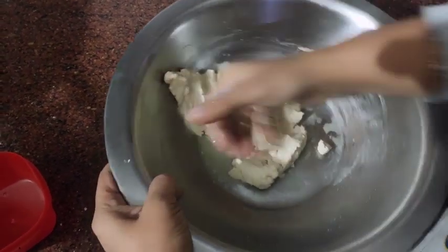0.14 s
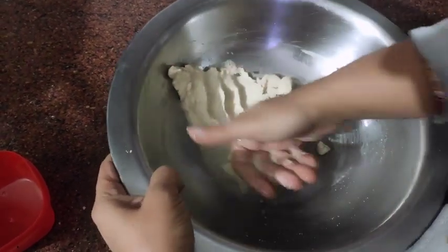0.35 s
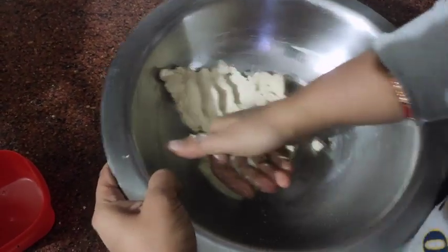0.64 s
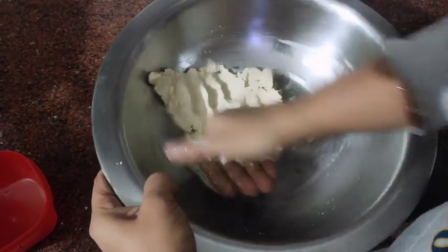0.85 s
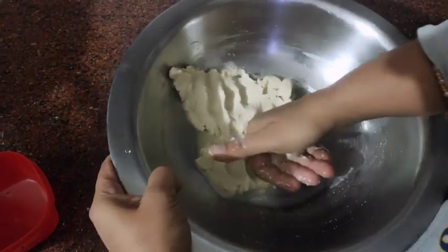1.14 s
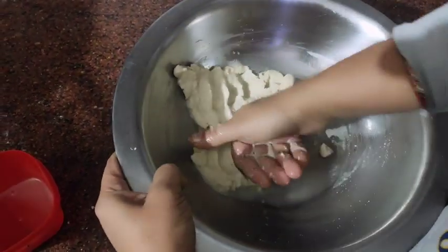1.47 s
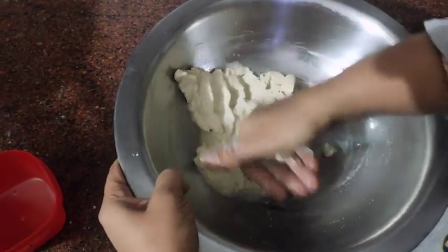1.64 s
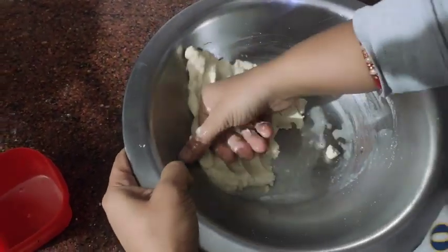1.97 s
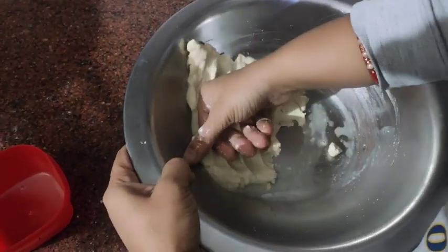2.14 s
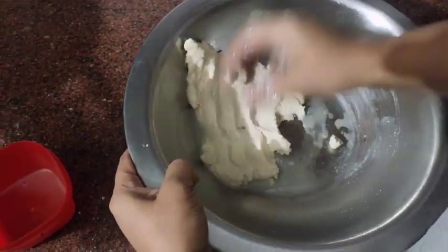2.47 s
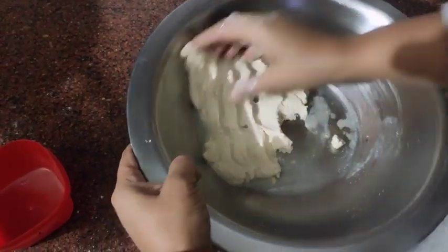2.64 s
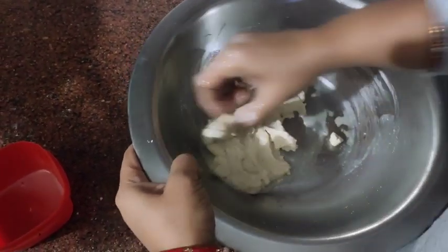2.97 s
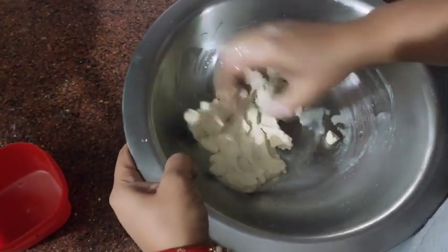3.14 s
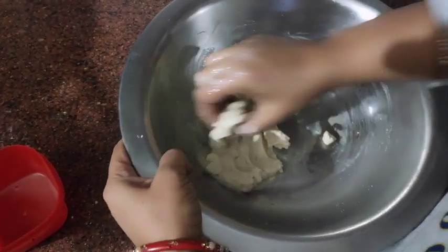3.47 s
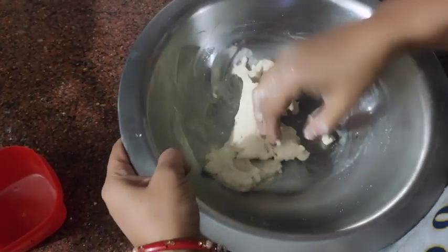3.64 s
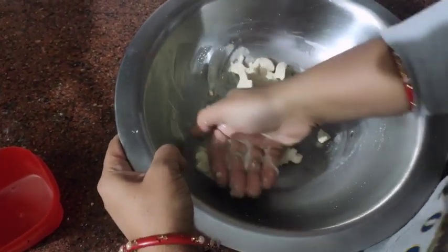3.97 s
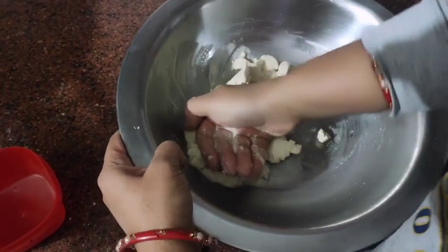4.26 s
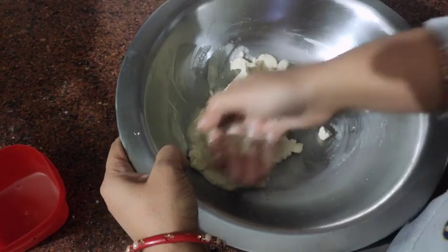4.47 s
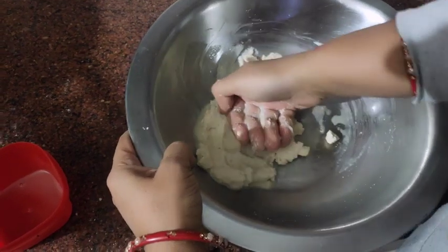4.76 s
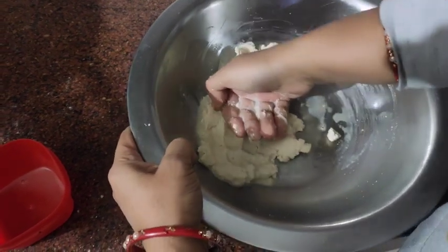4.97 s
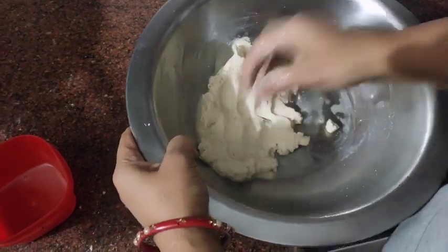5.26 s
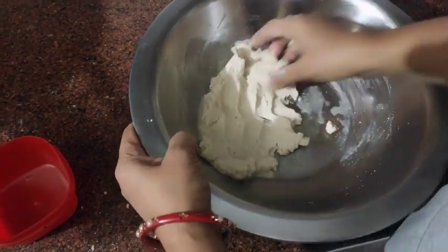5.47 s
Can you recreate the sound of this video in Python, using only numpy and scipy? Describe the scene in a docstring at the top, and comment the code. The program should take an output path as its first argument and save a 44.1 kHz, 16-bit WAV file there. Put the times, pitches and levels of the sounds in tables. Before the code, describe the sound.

Close, dry scrubbing hiss on thin metal, about three push-and-return pairs a second, with small bowl rattles, knocks on the floor and soft dough thumps.

```python
"""A hand kneads soft dough in a wide stainless steel bowl on a kitchen floor, close to a stereo microphone.
Rubbing on the steel, made of random slips, hisses in long pushes and short returns, about three pairs a second.
The jostled bowl clinks in dying sines, its base knocks and drags on the floor, and dough thuds in noise bursts.
Hard ticks are very short sines; quiet kitchen air and a faint mains hum lie behind."""
import sys
import numpy as np
from scipy import signal
from scipy.fft import rfft, irfft
from scipy.io import wavfile
from scipy.ndimage import uniform_filter1d

SR = 44100
rng = np.random.default_rng(int(sys.argv[2]) if len(sys.argv) > 2 else 0)


def store_wav(level_fs):
    """Save 16-bit WAV to argv[1]."""
    pcm = np.round(np.clip(np.atleast_2d(level_fs), -1, 1) * 32767)
    wavfile.write(sys.argv[1], SR, pcm.T.astype(np.int16))


N = 247530
TIME = np.arange(N) / SR

# one row a kneading cycle, a long push and then a short return: (start [s], relative push level at its end [dB],
# swell over the push [dB], offset halfway [dB], return length [s], relative return level [dB],
# dip at the turns [dB], rasp [dB], resonance of the hollow under the hand [Hz], its height [dB])
KNEADING_CYCLES = [(-0.22, -23, 3.5, -1.0, 0.052, -41.0, -6, 0, 5700, -3),
                   (0.051, -30.5, 6, -2, 0.074, -42.5, -1.5, -2, 3150, -2.5),
                   (0.295, -32.5, 4.5, -4.5, 0.088, -38.5, -9, -1.5, 3320, 3.5),
                   (0.628, -34, 4.0, 0, 0.076, -35, -8.5, -3.5, 3790, 8),
                   (0.903, -33, 1.5, -3.5, 0.081, -37.5, -11.5, -1.5, 4350, 7),
                   (1.209, -33.5, 3, -2.5, 0.076, -35.5, -11.5, -1.0, 5150, 8),
                   (1.508, -35, 0.5, 0, 0.084, -39, -10, -2.5, 5100, 6.5),
                   (1.82, -34, 2.0, -2, 0.075, -37, -11, -1, 4700, -0.5),
                   (2.122, -32.5, 4, -3, 0.073, -35, -11.5, -1.0, 2850, -2.5),
                   (2.424, -31.5, 5.5, -1.5, 0.076, -35.5, -11, -3.5, 2770, 2.5),
                   (2.725, -34.5, 1.5, -3, 0.085, -39.5, -13, -3, 2660, 6),
                   (3.034, -35, 4.5, -1, 0.084, -40, -8, -4, 2750, 3.5),
                   (3.34, -33.5, 6.5, -1.5, 0.089, -39.5, -8.5, -1, 7500, 4.5),
                   (3.637, -32, 3.5, -1.5, 0.087, -38.5, -12.5, -1, 5600, 7),
                   (3.939, -33.0, 1, -3, 0.079, -37.5, -8.5, -2.5, 4600, -1.5),
                   (4.226, -34.0, 9, -2.5, 0.093, -41, -12.5, 1.5, 4130, -4.5),
                   (4.549, -36, 4.5, -0.5, 0.086, -39, -10.5, -2.0, 2730, 4.5),
                   (4.842, -35.5, 1.5, -0.5, 0.093, -43, -12, -0.5, 6600, -1.5),
                   (5.151, -38, 5.5, 1, 0.084, -42.5, -10.5, -1.5, 6460, 6),
                   (5.448, -31, 12, 17, 0.12, -40.5, -11.0, 2.5, 2780, 2)]


def amp(db):
    """Decibels to gain."""
    return 10 ** (np.asarray(db) / 20)


def unit(x):
    """Scales to an rms of one."""
    return x / np.sqrt(np.mean(x ** 2) + 1e-20)


def colour(x, points):
    """Filters by a spectrum of (frequency [Hz], gain [dB]) points."""
    hz, db = np.transpose(points)
    f = np.fft.rfftfreq(x.shape[-1], 1 / SR)
    gain = amp(np.interp(np.log(f + 1), np.log(hz), db))
    return irfft(rfft(x) * gain, x.shape[-1])


def add(mix, s, sound):
    """Mixes a sound in at time s."""
    part = mix[max(round(s * SR), 0):][:len(sound)]
    part += sound[:len(part)]


def resonate(x, hz, width):
    """A resonance of gain one that follows the pitch hz: shift it to zero, smooth, and shift it back."""
    turn = np.exp(2j * np.pi * np.cumsum(hz * np.ones(len(x))) / SR)
    r = np.exp(-np.pi * width / SR)
    return 2 * (turn * signal.lfilter([1 - r], [1, -r], x / turn)).real


def slips(n, per_s, spread_db):
    """Random stick-slip impulses of uneven size."""
    size = amp(spread_db * np.minimum(rng.exponential(1, n), 4))
    return unit(size * rng.standard_normal(n) * (rng.random(n) < per_s / SR))


def ring(modes, t):
    """Dying sines of a struck part."""
    return sum(amp(db - 60 * t / t60) * np.sin(2 * np.pi * hz * t) for hz, db, t60 in modes)


def space(x, lag_s, bowl_db, bowl_t60, room_db, room_t60=0.13):
    """Direct sound, delayed on the right by the lag, then dense echoes inside the bowl and a weak kitchen tail."""
    t = np.arange(SR // 3) / SR
    paths = np.zeros((2, len(t)))
    paths[0, 0] = paths[1, round(abs(lag_s) * SR)] = 1
    for db, t60 in ((bowl_db, bowl_t60), (room_db, room_t60)):
        tail = rng.standard_normal(paths.shape) * amp(-60 * t / t60) * (t > .001)
        paths += amp(db) * tail / np.linalg.norm(tail, axis=1, keepdims=True)
    paths /= np.linalg.norm(paths, axis=1, keepdims=True)
    return signal.fftconvolve(x[None], paths, axes=1)[:, :N]


def panned(x, left_db):
    """Sets the left microphone this much above the right; negative leans to the right."""
    return x * amp([[left_db / 2], [-left_db / 2]])


def rubbing(hiss_db=9.0, rasp_db=12.5, rasp_growth=0.066, flutter_db=-0.68, split_hz=5400):
    """Tiny slips under the fingers and the heel of the hand swell and stop with each stroke; grip adds a lower rasp."""
    # hiss of rubbed steel at each microphone: (frequency [Hz], left gain [dB], right gain [dB])
    steel = [(30, -52, -69), (150, -46, -25.5), (626, -20.5, -18), (1280, -17.5, -18), (1740, -8.5, -12),
             (2090, -14, -12), (2533, -6.5, -8.5), (3680, -1.5, 0.5), (4020, -2.5, -10), (4456, -0.5, 1),
             (5150, -3.5, -0.5), (6550, 3.5, 0.5), (7190, 4.5, -7.5), (8270, -12.5, -15),
             (10840, -14, -16.5), (13200, -10.5, -9.5)]
    # modes of the wall that sing under the rubbing: (frequency [Hz], width [Hz], left gain [dB], right gain [dB])
    wall = [(923, 12, -13, -20), (2686, 25, -11, -20), (4355, 90, -5, -5), (5690, 55, -10, -6),
            (6155, 50, -5, -4), (6681, 120, -5, -8), (7110, 35, 3, -8)]
    # the fingers rub harder than the heel of the hand: (fingers level [dB], heel level [dB]), relative
    contacts_db = (2.8, -6)
    stroke_db, grip_db = strokes()
    grip_db = grip_db + rasp_growth * (stroke_db - stroke_db.mean())  # louder strokes rasp more
    low = 1 / (1 + (np.fft.rfftfreq(N, 1 / SR) / split_hz) ** 12)
    rub = np.zeros((2, N))
    for contact_db in contacts_db:
        flutter = flutter_db * unit(uniform_filter1d(rng.standard_normal((2, N)), size=600))
        grains = rfft(0.64 * slips(N, 3000, 1.9) + 0.35 * rng.standard_normal(N))
        hiss = irfft(grains * (1 - low), N) * amp(stroke_db + flutter[0] + hiss_db)
        rasp = irfft(grains * low, N) * amp(stroke_db + flutter[1] + grip_db + rasp_db)
        rub += amp(contact_db) * wander(hollow(hiss + rasp), spots_per_s=8, tint_db=3.3)
    out = []
    for side in range(2):
        sung = sum(amp(db[side]) * resonate(rub[side], hz, width) for hz, width, *db in wall)
        sung = np.pad(sung, (SR // 300, 0))[:N]  # the wall answers a moment after the contact
        rubbed = colour(rub[side], [(hz, db[side]) for hz, *db in steel])
        out.append(rubbed + sung)
    return np.array(out)


def strokes(end_s=8.9):
    """Level and grip of the hand: it speeds up, leans into the push, stops, and flicks back."""
    speed_up_s, slow_down_s, return_edge_s = 0.036, 0.046, 0.028
    grip_push_db, grip_return_db = -2.5, -3  # low rasp over hiss, before each stroke's own rasp
    s, push_db, swell_db, sag_db, return_s, return_db, dip_db, rasp_db, *_ = np.transpose(KNEADING_CYCLES)
    end = np.append(s[1:], end_s)
    turn = end - return_s
    early, late = s + speed_up_s, turn - slow_down_s
    rest_db = (push_db + return_db) / 2 + dip_db
    phases = [(early, push_db - swell_db, grip_push_db),
              ((early + late) / 2, push_db - swell_db / 2 + sag_db, grip_push_db),
              (late, push_db, grip_push_db),
              (turn, rest_db, grip_return_db),
              (turn + return_edge_s, return_db, grip_return_db),
              (end - return_edge_s, return_db, grip_return_db),
              (end, rest_db, grip_return_db)]
    at, level_db, grip_db = zip(*phases)
    at = np.maximum.accumulate(np.ravel(at, "F"))  # phases of a short return never run backwards
    level_db = np.interp(TIME, at, np.ravel(level_db, "F"))
    grip_db = np.interp(TIME, at, np.ravel(rasp_db[:, None] + grip_db))
    return level_db, grip_db


def hollow(x, width_hz=280):
    """The hollow between hand and steel resonates at a new pitch with each stroke."""
    s, *_, hz, db = np.transpose(KNEADING_CYCLES)
    stroke = np.clip(np.searchsorted(s, TIME) - 1, 0, len(s) - 1)
    hz, db = uniform_filter1d(np.array([hz, db])[:, stroke], size=2000)  # glide between strokes
    return x + (amp(db) - 1) * resonate(x, hz, width_hz)


def wander(x, spots_per_s, tint_db, count=13):
    """The hand moves round a ring of spots, each with its own notches and its own echoes in the bowl."""
    out, hz = np.zeros((2, N)), np.geomspace(800, 15000, num=64)
    for k in range(count):
        away = np.abs((TIME * spots_per_s - k + 1) % count - 1)
        near = np.cos(np.pi / 2 * np.minimum(away, 1))
        notches_db = tint_db * (1 - np.minimum(rng.exponential(1, len(hz)), 4))
        tinted = colour(x * near, np.c_[hz, notches_db])
        out += space(tinted, lag_s=.00045, bowl_db=6.5, bowl_t60=.03, room_db=-9)
    return out


def clinks(clunk_db=5.0, ping_db=16.0, scuff_db=-12.0, scuff_s=0.04):
    """A short rattling contact gives the held rim a dry clunk and a ping, with a new mix each time, and a scuff."""
    # light clinks of the bowl: (time [s], relative clunk level [dB], relative ping level [dB])
    clink_times = [(0.116, -32.5, -28.5), (0.168, -36.5, -35), (0.292, -33.5, -25.5), (0.382, -29.5, -23),
                   (0.579, -39.5, -36), (0.851, -33.5, -33.5), (1.06, -39.5, -27), (1.525, -41, -33),
                   (2.291, -37.5, -40), (2.478, -45.5, -82.5), (2.779, -31, -37), (2.87, -38, -46),
                   (2.982, -38.5, -48), (3.111, -42.5, -42), (3.279, -35, -45), (3.402, -29.5, -28.5),
                   (3.64, -39.5, -30), (3.693, -39.5, -36), (3.933, -42.5, -33), (4.381, -45, -50),
                   (4.501, -39.5, -44), (4.523, -36, -43), (5.138, -35, -36.5), (5.188, -42, -48),
                   (5.371, -50, -59), (5.396, -37.5, -46), (5.476, -34, -39.5), (5.52, -38, -45),
                   (5.584, -35, -34)]
    # modes of the rim: (nominal frequency [Hz], nominal level [dB], t60 [s])
    rim = [(930, -19, 0.28), (990, 0, 0.016), (1130, -6, 0.012), (1670, -20, 0.03), (2700, -23, 0.15),
           (3050, -7, 0.008), (3380, -1, 0.014), (3520, -20, 0.05), (3750, -7, 0.007)]
    scuff_spectrum = [(400, -20), (1050, 0), (1500, -10), (3400, -16), (5000, -35), (9000, -60)]
    # the place of contact changes the mix and the damped modes
    spread_db, detune = 1.5, .025
    clunk_rise_s, ping_rise_s = .0004, .0014  # the high modes build up more slowly
    t, out = np.arange(SR // 2) / SR, np.zeros(N)
    for s, low_db, high_db in clink_times:
        contact = .018 * rng.standard_normal(len(t)) * np.exp(-t / .0035)
        contact[0] = 1
        modes = [(hz * (1 + detune * (t60 < .1) * rng.standard_normal()),
                  db + spread_db * rng.standard_normal(), t60) for hz, db, t60 in rim]
        clunk = ring([m for m in modes if m[0] < 2000], t) * (1 - np.exp(-t / clunk_rise_s))
        ping = ring([m for m in modes if m[0] >= 2000], t) * (1 - np.exp(-t / ping_rise_s))
        struck = amp(low_db + clunk_db) * clunk + amp(high_db + ping_db) * ping
        tone = signal.fftconvolve(contact, struck)[:len(t)]
        scuff = unit(colour(rng.standard_normal(len(t)), scuff_spectrum))
        add(out, s, tone + amp(low_db + scuff_db) * scuff * np.exp(-t / scuff_s))
    # a thin rim radiates no bass
    out = signal.sosfilt(signal.butter(2, 600, "high", fs=SR, output="sos"), out)
    heard = space(out, lag_s=.0002, bowl_db=-12, bowl_t60=.03, room_db=-17)
    return panned(heard, left_db=2.5)


def base(knock_db=-17.0, drag_db=2.0):
    """The base knocks, chatters and drags; in the drags its pitch rises as the thin steel is flexed."""
    # the base knocks on the floor: (time [s], relative level [dB], chatter decay [s],
    # pitch factor on the base modes [ratio], brightness [dB per two octaves])
    knocks = [(1.5245, -49, 0.016, 0.91, 25), (2.6065, -23, .003, 1.3, 4.5),
              (2.6122, -20.5, 0.0049, 1.05, 5.5), (3.279, -15.5, 0.0075, 1.0, -5.5),
              (5.3945, -22, .0015, 1.2, -5), (5.478, -37, .003, 0.88, -5)]
    # the base drags on the floor: (time [s], length [s], relative level [dB], fade [dB/s], pitch factor [ratio],
    # its rise [1/s], centre of the grinding [Hz], fall to either side [dB/octave])
    drags = [(2.622, 0.069, -44.5, 40, 0.88, 0.29, 330, 5), (2.628, 0.29, -51, 4, 1.03, 0.57, 890, 11),
             (3.29, 0.14, -41, 73, 1.0, 0.05, 520, 2), (5.402, 0.12, -47, -3, 1.03, 0.087, 590, 12),
             (5.463, 0.29, -43.5, 19, 0.97, 0.11, 695, 16)]
    # modes of the base before the pitch factor: (frequency [Hz], relative level [dB], t60 [s])
    base_modes = [(303, -5, 0.22), (357, -2, 0.075), (410, -10, 0.042), (497, -8, 0.22), (598, 0, 0.075),
                  (696, -2, 0.07), (885, -3, 0.05), (1145, -5, 0.055), (1370, -6, 0.09), (1760, -13, 0.094)]
    drag_width = 2.0  # width of a dragged mode [Hz] times its t60 [s]
    t, out = np.arange(SR // 2) / SR, np.zeros(N)
    for s, db, chatter_s, pitch, bright_db in knocks:
        contact = .014 * slips(len(t), 1500, 1.0) * np.exp(-t / chatter_s)
        contact[0] = 1
        modes = [(hz * pitch, mode_db + bright_db * np.log2(hz / base_modes[0][0]) / 2, t60)
                 for hz, mode_db, t60 in base_modes]
        knock = signal.fftconvolve(contact, ring(modes, t))[:len(t)]
        add(out, s, amp(db + knock_db) * knock)
    for s, length_s, db, fade_db_per_s, pitch, rise_per_s, grind_hz, fall_db in drags:
        grit = slips(len(t), 2000, .6)
        flex = pitch + rise_per_s * t
        tone = sum(amp(mode_db - fall_db * abs(np.log2(hz / grind_hz)))
                   * resonate(grit, hz * flex, drag_width / t60) for hz, mode_db, t60 in base_modes)
        envelope = np.minimum(t / .01, 1) * np.maximum(1 - (t / length_s) ** 4, 0)
        add(out, s, amp(drag_db + db - fade_db_per_s * t) * envelope * unit(tone))
    out = signal.sosfilt(signal.butter(5, [270, 1900], "band", fs=SR, output="sos"), out)
    heard = space(out, lag_s=0, bowl_db=-9, bowl_t60=.04, room_db=-10)
    return panned(heard, left_db=-2.5)


def thuds(level_db=1.0, attack_s=0.003):
    """Soft dough squashes against the steel with a dull push and a short boom of the wall."""
    # dough pushed against the bowl: (time [s], relative level [dB], decay [s], boom of the wall over the push [dB])
    pushes = [(.118, -62, 0.084, 12.5), (0.295, -61, 0.05, 5.5), (.384, -56, 0.045, -6),
              (0.852, -55.5, 0.058, -1), (1.091, -56.5, 0.08, 1), (1.526, -47.5, 0.032, -1.5),
              (2.296, -58, 0.06, 7.5), (2.61, -55, 0.061, 8), (3.28, -55, 0.062, 7.5),
              (3.403, -62, 0.06, 13), (3.578, -59, 0.076, -5.5), (3.905, -61, 0.05, 3),
              (4.502, -53.5, 0.024, 7), (4.892, -75, 0.035, 21.5), (5.092, -66.5, 0.069, 16),
              (5.394, -55.5, 0.026, 11), (5.475, -57.5, 0.14, 0)]
    # spectrum of the squashed dough: (frequency [Hz], gain [dB])
    dough = [(30, -24), (70, -7), (110, 8), (200, 6), (340, 2), (800, -6), (1500, -12), (4000, -50)]
    boom_hz, pass_width_hz = 532, 182  # the wall, damped by the dough, as two equal resonances in a row
    t, out = np.arange(SR // 2) / SR, np.zeros(N)
    for s, db, decay_s, boom_db in pushes:
        squash = rng.standard_normal(len(t))
        boom = resonate(resonate(squash, boom_hz, pass_width_hz), boom_hz, pass_width_hz)
        push = (1 - np.exp(-t / attack_s)) * np.exp(-t / decay_s)
        body = unit(colour(squash, dough)) + amp(boom_db) * unit(boom)
        add(out, s, amp(db + level_db) * push * body)
    heard = space(out, lag_s=0, bowl_db=-11, bowl_t60=.04, room_db=-10)
    return panned(heard, left_db=-3.0)


def snaps(decay_s=0.00018):
    """Hard ticks on the steel: sines only a few cycles long."""
    # sharp ticks: (time [s], relative level [dB], pitch [Hz])
    ticks = [(0.1848, -20, 6800), (1.5322, -8, 4300), (2.607, -23, 6300), (2.613, -23, 6400),
             (3.935, -30, 2400), (4.385, -31, 1900), (4.912, -19, 6200)]
    t, out = np.arange(SR // 100) / SR, np.zeros(N)
    for s, db, hz in ticks:
        envelope = t / decay_s * np.exp(1 - t / decay_s)
        add(out, s, amp(db) * envelope * np.sin(2 * np.pi * hz * t))
    return space(out, lag_s=0, bowl_db=-6, bowl_t60=.012, room_db=-13)


def room():
    """Quiet kitchen air, noise largely shared by both microphones, and a faint hum of steady sines."""
    # spectrum of the room noise: (frequency [Hz], gain [dB])
    air_spectrum = [(25, -22), (55, -4.5), (110, -2), (170, 0), (240, 0), (305, 3.5), (400, 0), (540, 2),
                    (750, -3), (1500, -10), (5000, -15.5), (15000, -13)]
    # faint mains hum: (frequency [Hz], rms level [dB])
    hum_tones = [(100, -83), (200, -80), (300, -70.5)]
    air = rng.standard_normal(N) + .5 * rng.standard_normal((2, N))
    hum = sum(amp(db) * np.sqrt(2) * np.sin(2 * np.pi * (hz * TIME + rng.random())) for hz, db in hum_tones)
    return amp(-64) * unit(colour(air, air_spectrum)) + hum


def scene():
    """All the sounds of the bowl over the room."""
    return rubbing() + clinks() + base() + thuds() + snaps() + room()


def record(dry, edge_hz=15550):
    """The recorder's band limit, a steep low-pass."""
    low_pass = signal.firwin(511, edge_hz, window=("kaiser", 9), fs=SR)
    return signal.oaconvolve(dry, low_pass[None], "same")


dry = scene()
out = record(dry)
store_wav(out)
```